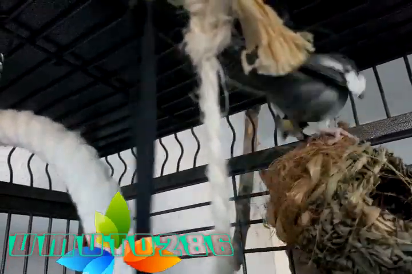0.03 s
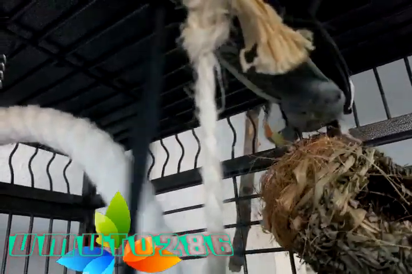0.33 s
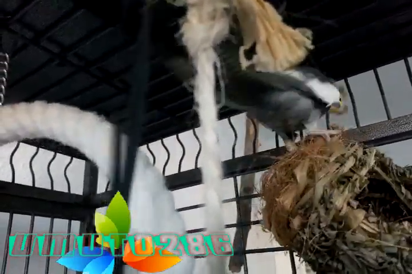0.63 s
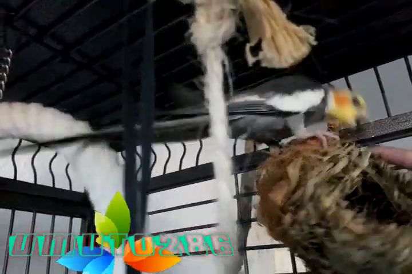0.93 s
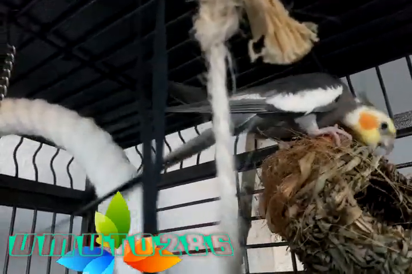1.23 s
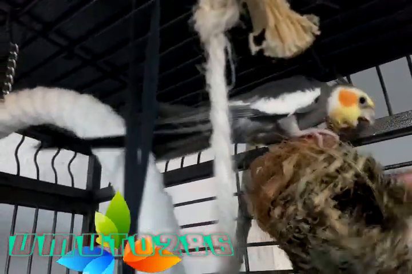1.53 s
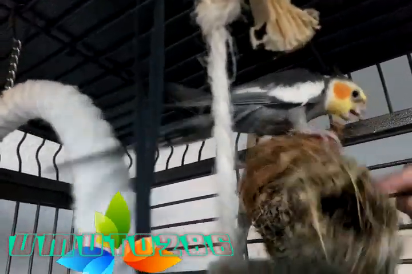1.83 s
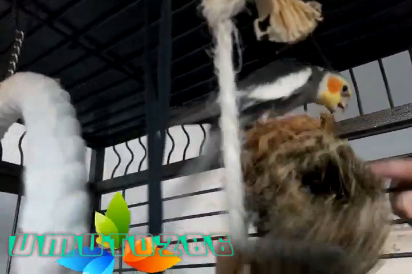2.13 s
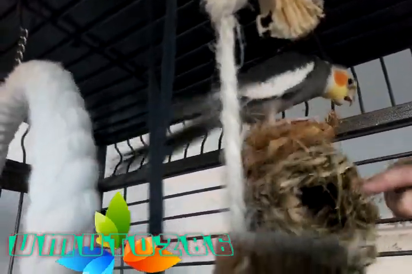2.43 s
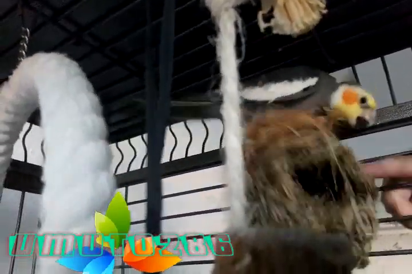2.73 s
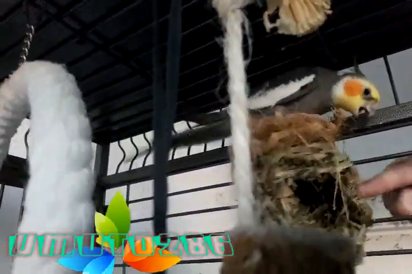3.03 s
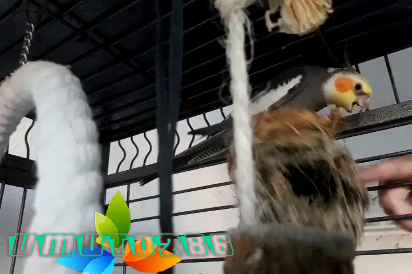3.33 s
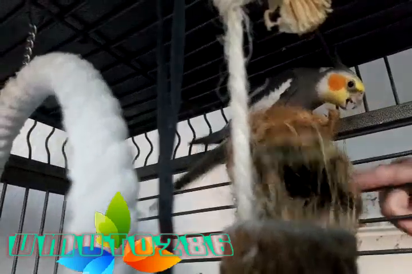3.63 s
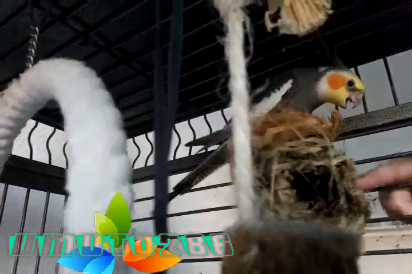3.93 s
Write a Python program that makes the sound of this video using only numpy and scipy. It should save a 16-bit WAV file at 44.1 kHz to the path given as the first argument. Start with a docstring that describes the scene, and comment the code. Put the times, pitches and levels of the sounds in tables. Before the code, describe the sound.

Close and slightly to the right, a defensive cockatiel hisses in bursts, one longer hiss followed by clipped rasping calls and thin squeaks. Light clicks, rustling straw and faint cage knocks sound beneath, in a quiet room with slight reverberation.

```python
"""A cockatiel hisses, yelps and squeaks, close by and a little to the right, defending its nest from a finger.
Turbulent air shaped by the throat makes the hisses; short harmonic notes that break into a rasp make the
yelps; thin whistles and narrow bands of noise make the squeaks and squeals. Beak and claws tick,
the nest's straw crackles, and the wire cage rings in its low modes as it is bumped and shaken.
A small quiet room reverberates after each call."""
import sys
import numpy as np
from scipy import signal
from scipy.fft import rfft, irfft
from scipy.io import wavfile

SR = 44100
rng = np.random.default_rng(int(sys.argv[2]) if len(sys.argv) > 2 else 0)


def store_pcm(level_fs):
    """Save levels as 16-bit WAV."""
    pcm = np.round(np.clip(level_fs, -1, 1) * 32767).astype(np.int16)
    wavfile.write(sys.argv[1], SR, np.atleast_2d(pcm).T)


N = 176400

HISS_RISE_S, HISS_FALL_S, HISS_RATTLE, RATTLE_HZ = 0.0045, 0.0036, 0.25, 460
# Spectrum of the air stream for each throat shape: frequency_hz, gain_db
THROAT_SPECTRA = {"gaping": [(150, -33), (350, -27.5), (600, -9), (1100, -3), (1500, -10), (2200, -4.5),
                  (3000, 0), (3800, -6.5), (5000, -7), (5900, -5.5), (7000, -14), (8000, -20),
                  (9200, -35.5), (11500, -29), (15000, -33)], "tense": [(150, -48), (350, -22.5),
                  (600, -11), (1100, -8), (2100, -3), (3300, -4), (4200, -1), (4800, -12), (5700, -3),
                  (6600, -14), (7600, -4), (9000, -64), (11000, -19.5), (13500, -34), (15500, -25)],
                  "narrow": [(150, -40), (400, -15), (900, -9), (1500, -8), (2200, -14.5), (3000, -1),
                  (3900, 2), (5000, -9), (6500, -9), (8500, -34), (13000, -29)], "thin": [(300, -35),
                  (1500, -10), (3300, -9), (4400, 2.5), (6200, 1), (7600, -6), (9000, -30), (14000, -16)]}
# Pushes of breath: start_s, length_s, level_db, change_db, tilt_db_per_octave, throat_shape
HISSES = [(0.281, 0.034, -42, -4, 1.5, "narrow"), (.320, 0.042, -38, -3.5, 0.5, "narrow"),
          (1.01, 0.12, -37, -1, 1, "gaping"), (1.131, 0.29, -38, -3.5, -0.04, "gaping"),
          (1.01, 0.088, -42.5, -6, 4.5, "thin"), (1.369, 0.036, -52, 3, -6, "thin"),
          (1.7, 0.037, -48, -0.5, -0.5, "thin"), (2.117, 0.053, -49.5, 0.5, -1.5, "tense"),
          (2.168, 0.045, -35, -10.5, -1.5, "tense"), (2.461, 0.047, -47, -1.5, 1, "thin"),
          (2.878, 0.016, -47, 1.5, 2, "gaping"), (3.057, 0.027, -59, 21.5, 0, "tense"),
          (3.084, 0.073, -36, -2, -.3, "tense"), (3.475, 0.028, -43.5, 3.5, -0.5, "tense"),
          (3.508, 0.12, -47, -1, 0.5, "narrow"), (3.530, 0.028, -37, -4.5, 1.5, "tense"),
          (3.61, 0.047, -43, 5.5, 0.5, "tense"), (3.653, 0.086, -38.5, 0, 0.36, "tense"),
          (3.981, .03, -46, 3, -1, "tense")]


def hiss(length_s, level_db, change_db, tilt_db_per_octave, throat_shape):
    """Source and filter: throat resonances shape a turbulent flow that swells or weakens."""
    t = np.arange(0, length_s + .05, 1 / SR)
    stream = turbulence(len(t), THROAT_SPECTRA[throat_shape], tilt_db_per_octave, HISS_RATTLE)
    swell = amp(level_db + change_db * np.minimum(t / length_s, 1))
    return stream * gate(t, length_s, HISS_RISE_S, HISS_FALL_S) * swell


def turbulence(n, spectrum, tilt_db_per_octave, rattle):
    """Turbulent flow: broadband noise passes through the throat in irregular puffs."""
    puffs = rng.standard_normal(n) * np.exp(rattle * wobble(n, RATTLE_HZ))
    return colour(puffs, [(hz, db + tilt_db_per_octave * np.log2(hz)) for hz, db in spectrum])


YELP_RISE_S, YELP_FALL_S, GLIDE_S = 0.0018, 0.0026, .014
JITTER, WAVER = 0.093, 0.0097  # fast and slow pitch deviation, as fractions of the pitch
RASP_RISE_S, RASP_RATTLE = 0.0027, 0.54
# Spectral envelope of the voice's harmonics: frequency_hz, gain_db
VOICE_SPECTRUM = [(1300, 0), (1700, 3), (2800, -10), (4100, -1.5), (5400, -10.5), (7100, -10.5),
                  (9000, -32.5), (12500, -14.5), (16000, -40)]
# Spectrum of the throat's rasp: frequency_hz, gain_db
RASP_SPECTRUM = [(150, -44), (350, -20), (550, -4.5), (800, 2), (1100, 0), (2200, 0), (3000, -0.5),
                 (4100, -1), (5000, -7.5), (6000, -6), (7300, -7), (9000, -48), (12700, -13), (15500, -21)]
# Rasping calls: start_s, length_s, tone_db, rasp_db, tilt_db_per_octave, from_hz, top_hz, roughness
YELPS = [(0.242, 0.03, -42, -39.5, -1.5, 1271, 1492, 0.56), (1.629, 0.025, -44, -42, 1.5, 1276, 1594, 1),
         (2.0419, 0.026, -37, -40.5, -2, 1267, 1752, 0.4), (2.4246, 0.023, -35, -42, -1, 1404, 1728, 0.77),
         (2.701, 0.022, -42, -39.5, 1, 1518, 1760, 1.07), (2.848, 0.027, -41, -36.5, 1, 1350, 1640, .8),
         (3.023, 0.0056, -37, -38.5, 0, 1313, 1320, 0.2), (3.031, 0.017, -35.5, -37, .3, 1588, 1650, 0.36),
         (3.3925, 0.025, -32.5, -46.5, 2.5, 1299, 1728, 0),
         (3.4726, 0.027, -44, -42.5, -1.5, 1470, 1682, 0.7), (3.931, 0.032, -40, -41.5, -2, 1283, 1667, .6)]


def yelp(length_s, tone_db, rasp_db, tilt_db_per_octave, from_hz, top_hz, roughness):
    """Aperiodic vibration: jitter and shimmer roughen a rising harmonic note, over a turbulent rasp."""
    t = np.arange(0, length_s + .03, 1 / SR)
    n = len(t)
    chaos = roughness * np.minimum(t / RASP_RISE_S, 1)
    pitch_hz = from_hz + (top_hz - from_hz) * (1 - np.exp(-(t / GLIDE_S) ** 2))
    unsteadiness = 1 + JITTER * chaos * wobble(n, hz=754) + WAVER * wobble(n, hz=120)
    phase = 2 * np.pi * np.cumsum(pitch_hz * unsteadiness) / SR
    tone = unit(sum(amp(value_at(VOICE_SPECTRUM, k * pitch_hz)) * np.cos(k * phase) for k in range(1, 10)))
    shimmer = 1 + 0.29 * chaos * wobble(n, RATTLE_HZ)
    tone *= shimmer * gate(t, length_s - .003, YELP_RISE_S, YELP_FALL_S)
    rasp = turbulence(n, RASP_SPECTRUM, tilt_db_per_octave, RASP_RATTLE)
    rasp *= gate(t, length_s, RASP_RISE_S, YELP_FALL_S)
    return amp(tone_db) * tone + amp(rasp_db) * rasp


SQUEAK_JITTER = .012
# Thin whistles: start_s, length_s, level_db, from_hz, to_hz, step_db_per_harmonic
SQUEAKS = [(0, .010, -44, 2500, 3150, -6), (.009, .006, -33, 3050, 2750, -22),
           (1.4415, .011, -33, 2800, 2150, -12), (1.684, .014, -47, 2200, 2000, -10),
           (2.066, .014, -43, 1750, 2000, -3), (2.550, .010, -39, 2370, 2280, -9),
           (2.726, .009, -35, 4550, 4050, -25), (2.883, .019, -34, 2950, 2080, -18),
           (3.092, .014, -38, 2000, 2150, -5), (3.160, .005, -38, 4300, 4200, -25)]


def squeak(length_s, level_db, from_hz, to_hz, step_db):
    """Nearly periodic vibration: a whistle of three harmonics slides and settles."""
    progress = np.arange(0, length_s, 1 / SR) / length_s
    pitch_hz = to_hz + (from_hz - to_hz) * (1 - progress) ** 1.47
    pitch_hz *= 1 + SQUEAK_JITTER * wobble(len(progress), hz=506)
    phase = 2 * np.pi * np.cumsum(pitch_hz) / SR
    tone = sum(amp(step_db * k) * np.sin((k + 1) * phase) for k in range(3))
    return amp(level_db) * unit(np.sqrt(np.sin(np.pi * progress)) * tone)


BAND_HALF_WIDTH_HZ = 320
# First the faint, falling ring of a squeak dying away in the room, then four squeals:
# start_s, length_s, level_db, from_hz, to_hz
SLIDING_BANDS = [(.015, .225, -57, 2850, 2450), (.283, .100, -45, 3350, 4150),
                 (2.045, .028, -45, 7200, 7450), (2.170, .050, -43, 4200, 4100),
                 (2.708, .014, -38, 4150, 4300)]


def sliding_band(length_s, level_db, from_hz, to_hz):
    """Narrow-band noise: heard as a blurred pitch that slides up or down."""
    t = np.arange(0, length_s + .03, 1 / SR)
    phase = 2 * np.pi * np.cumsum(np.interp(t, [0, length_s], [from_hz, to_hz])) / SR
    band = sum(wobble(len(t), BAND_HALF_WIDTH_HZ) * wave(phase) for wave in (np.cos, np.sin))
    return amp(level_db) * band * gate(t, length_s, HISS_RISE_S, YELP_FALL_S)


TICK_DECAY_S = .0013
# Spectrum of a beak or claw strike: frequency_hz, gain_db
TICK_SPECTRUM = [(200, -13), (1500, -8), (4000, -2), (7000, -11), (9000, -13.5), (12000, -6), (15000, -2.5)]
# Beak and claw strikes: start_s, level_db
TICKS = [(.198, -31), (.4005, -44), (.566, -48), (.578, -46), (.645, -43), (.835, -42), (1.136, -32),
         (1.4525, -29), (1.462, -37), (1.5459, -44), (1.6726, -34), (2.2273, -39), (2.683, -39),
         (3.922, -35)]
# Clicks of the throat: start_s, level_db
THROAT_CLICKS = [(1.005, -40), (1.6585, -34), (2.126, -41), (2.698, -31), (2.8485, -35), (3.1018, -28),
                 (3.623, -39), (3.630, -35)]


def tick(start_s, level_db, spectrum):
    """Heavily damped transient: a dry snap of noise."""
    t = np.arange(-256, 1024) / SR  # the lead-in holds the filter's spread
    decay = (t >= 0) * np.exp(-abs(t) / TICK_DECAY_S)
    snap = colour(rng.standard_normal(len(t)) * decay, spectrum)
    return start_s + t[0], amp(level_db) * snap * np.sqrt(np.mean(decay ** 2))


CRACKLES_PER_S, CRACKLE_SPREAD_DB, CLUMP_DB, CLUMP_HZ, STRAW_SCATTER = 3500, 4, 3.2, 40, .8
# Spectrum of snapping straw: frequency_hz, gain_db
STRAW_SPECTRUM = [(200, -23), (600, -1.5), (2000, 4), (4000, 0.5), (7300, 0.5), (8800, -8.5), (11500, -2.5),
                  (15000, 2.5)]
# Handling of the nest: time_s, level_db
RUSTLE_LEVEL = [(0, -49), (.30, -62), (.42, -83), (.60, -64), (.645, -51.5), (.68, -62), (.84, -58.5),
                (.96, -57.5), (1.32, -74), (1.43, -48), (1.50, -80), (1.57, -60), (1.86, -56.5),
                (2.15, -50.5), (2.34, -57), (2.68, -53), (2.98, -55.5), (3.34, -60), (3.5, -63),
                (3.86, -66.5), (4, -80)]


def straw():
    """Shot noise: tiny snaps of dry straw come in clumps and scatter unevenly left and right."""
    shape = (3, N)  # one stream through the room, one straight to each side
    impulses = (rng.random(shape) < CRACKLES_PER_S / SR) * rng.choice([-1, 1], shape)
    strengths = amp(CRACKLE_SPREAD_DB * np.minimum(rng.exponential(1, shape), 4))
    clumps = amp(CLUMP_DB * wobble(N, CLUMP_HZ))
    snaps = colour(impulses * strengths, STRAW_SPECTRUM) * envelope(RUSTLE_LEVEL) * clumps
    return .5 * room(snaps[0]) + STRAW_SCATTER * amp([[LEFT_DB], [0]]) * snaps[1:]


# Knocks on the cage: start_s, level_db, pitch_hz, t60_s
BUMPS = [(.226, -57, 290, .2), (.76, -59, 320, .2), (.945, -55, 334, .15), (.977, -53, 336, .15),
         (1.551, -48, 212, .1), (1.82, -57, 245, .18)]


def bump(level_db, pitch_hz, t60_s):
    """Free vibration: a soft knock starts one low mode, which decays exponentially."""
    t = np.arange(SR // 2) / SR
    ring = np.minimum(t / 0.006, 1) * np.exp(-np.log(1000) * t / t60_s)
    return amp(level_db) * ring * np.sin(2 * np.pi * pitch_hz * t)


# Low modes of the cage: frequency_hz, width_hz, gain_db
CAGE_MODES = [(252, 21, -3), (328.3, 38, 0), (412, 63, -6)]
# Murmur of the shaken cage: time_s, level_db
CAGE_LEVEL = [(0, -61), (.33, -63.5), (.55, -79), (.9, -67), (1.05, -60.5), (1.38, -63.5), (1.55, -69),
              (2.7, -76.5), (4, -79)]


def cage():
    """Forced vibration: small random shakes keep the cage's modes ringing."""
    f = np.fft.rfftfreq(N, 1 / SR)
    modes = sum(amp(db) / (1 + (2 * (f - hz) / width_hz) ** 2) for hz, width_hz, db in CAGE_MODES)
    return unit(irfft(rfft(rng.standard_normal(N)) * modes, N)) * envelope(CAGE_LEVEL)


REFLECTIONS_PER_S, EARLY_DB, EARLY_DECAY_S = 5000, -4.5, 0.0046
LEFT_DB, LEFT_LAG_S, LEFT_REFLECTED_DB = -6.5, 0.00014, -2.5
# Reverberation of the small room: centre_hz, t60_s, level_db
ROOM_BANDS = [(235, .4, -4), (840, 0.4, -25), (1890, 0.58, -4.5), (2570, 0.31, -8), (4200, 0.31, -9),
              (6500, 0.4, -11), (14000, 0.22, -10)]


def room(x):
    """Propagation: direct sound reaches the right side first; early reflections and reverberation follow."""
    t = np.arange(SR * 3 // 4) / SR
    f = np.fft.rfftfreq(len(t), 1 / SR)
    taps = rng.standard_normal((2, len(t))) * (rng.random((2, len(t))) < REFLECTIONS_PER_S / SR)
    early = taps * (t > .0005) * np.exp(-t / EARLY_DECAY_S)
    response = amp(EARLY_DB) * early / np.linalg.norm(early, axis=1, keepdims=True)
    centres_hz = [row[0] for row in ROOM_BANDS]
    for share, (_, t60_s, level_db) in zip(np.eye(len(ROOM_BANDS)), ROOM_BANDS):
        band = irfft(rfft(unit(taps)) * value_at(list(zip(centres_hz, share)), f), len(t))
        decay = (t > .005) * np.exp(-np.log(1000) * t / t60_s)
        response += amp(level_db) * band * decay / np.linalg.norm(decay)
    delayed = irfft(rfft(x) * np.exp(-2j * np.pi * np.fft.rfftfreq(N, 1 / SR) * LEFT_LAG_S), N)
    direct = np.array([amp(LEFT_DB) * delayed, x])
    reflected = signal.fftconvolve(x[None], response, axes=1)[:, :N]
    return direct + amp([[LEFT_REFLECTED_DB], [0]]) * reflected


AMBIENT_DB = -64
# Spectrum of the room's noise: frequency_hz, gain_db
AMBIENT_SPECTRUM = [(20, -4), (60, -7.5), (80, -13.5), (100, 4), (125, -13), (170, -8.5), (300, 0),
                    (430, 1.5), (700, -4), (1500, -12.5), (4000, -13.5), (7000, -17.5), (9000, -25),
                    (15000, -16)]


def ambient_noise():
    """Partial coherence: the two sides share some of the room's steady noise."""
    noise = rng.standard_normal((2, N)) + 1.1 * rng.standard_normal(N)
    return amp(AMBIENT_DB) * colour(noise, AMBIENT_SPECTRUM)


def amp(db):
    return 10 ** (np.asarray(db) / 20)


def unit(x):
    return x / np.sqrt(np.mean(x ** 2) + 1e-20)


def value_at(points, hz):
    """Interpolation on a log-frequency axis."""
    f, values = np.transpose(points)
    return np.interp(np.log(hz + 1), np.log(f + 1), values)


def colour(x, spectrum):
    """Linear filtering by a spectrum, scaled to unit RMS."""
    n = x.shape[-1]
    return unit(irfft(rfft(x) * amp(value_at(spectrum, np.fft.rfftfreq(n, 1 / SR))), n))


def wobble(n, hz):
    """Low-pass noise: random motion up to about a given rate."""
    rolloff = np.sqrt(1 + (np.fft.rfftfreq(n, 1 / SR) / hz) ** 4)
    return unit(irfft(rfft(rng.standard_normal(n)) / rolloff, n))


def envelope(points):
    """Gain along a level curve."""
    return amp(np.interp(np.arange(N) / SR, *np.transpose(points)))


def gate(t, length_s, rise_s, fall_s):
    """Linear attack, hold, exponential release."""
    return np.minimum(t / rise_s, 1) * np.exp(-np.maximum(t - length_s, 0) / fall_s)


def add(mix, start_s, sound):
    part = mix[max(round(start_s * SR), 0):][:len(sound)]
    part += sound[:len(part)]


def scene():
    """Superposition: bird and cage sound in one room, with the straw and the ambient noise."""
    near = cage()
    sources = (hiss, HISSES), (yelp, YELPS), (squeak, SQUEAKS), (sliding_band, SLIDING_BANDS), (bump, BUMPS)
    for source, table in sources:
        for start_s, *settings in table:
            add(near, start_s, source(*settings))
    for table, spectrum in ((TICKS, TICK_SPECTRUM), (THROAT_CLICKS, RASP_SPECTRUM)):
        for start_s, level_db in table:
            add(near, *tick(start_s, level_db, spectrum))
    return room(near) + straw() + ambient_noise()


def record(dry):
    """Band limiting: a steep low-pass filter removes the highest treble."""
    cutoff_hz = 15950
    lowpass = signal.firwin(511, cutoff_hz, window=("kaiser", 9), fs=SR)
    return signal.oaconvolve(dry, lowpass[None], "same")


dry = scene()
out = record(dry)
store_pcm(out)
```